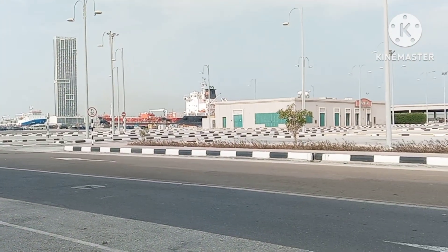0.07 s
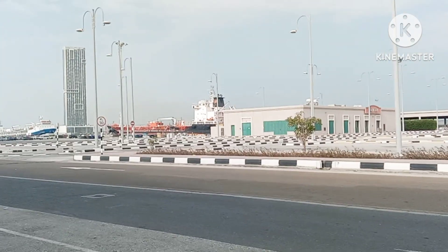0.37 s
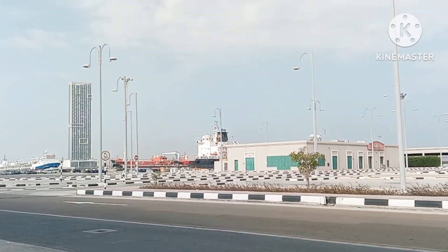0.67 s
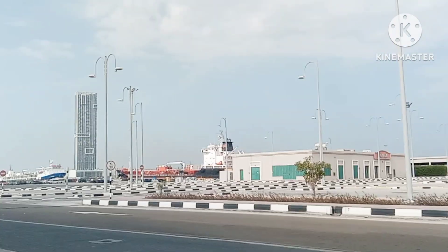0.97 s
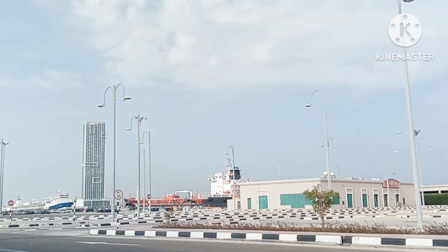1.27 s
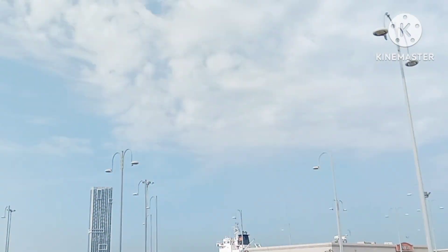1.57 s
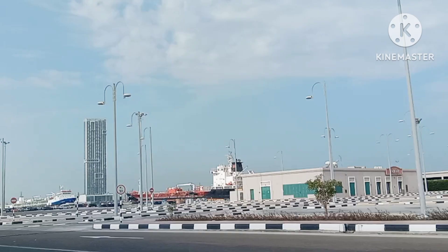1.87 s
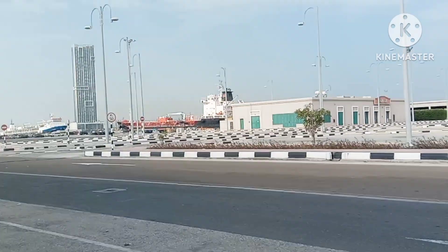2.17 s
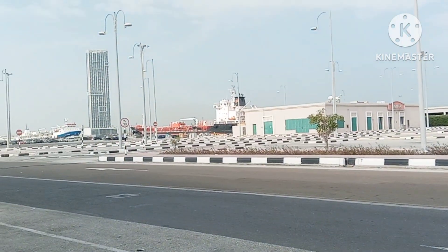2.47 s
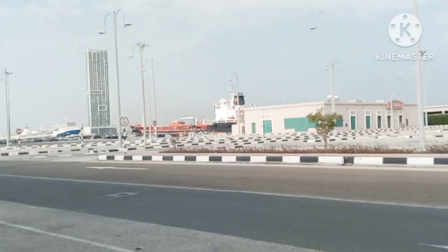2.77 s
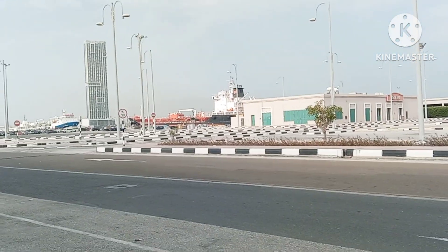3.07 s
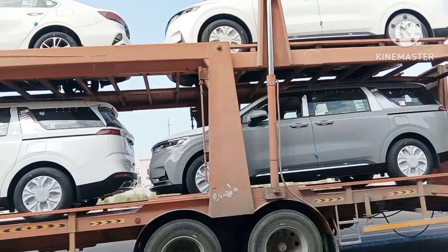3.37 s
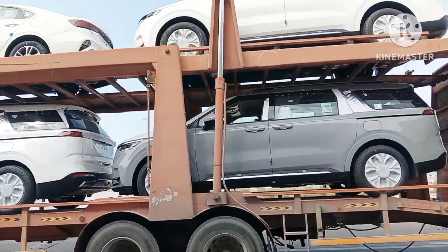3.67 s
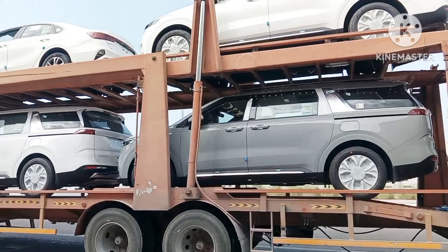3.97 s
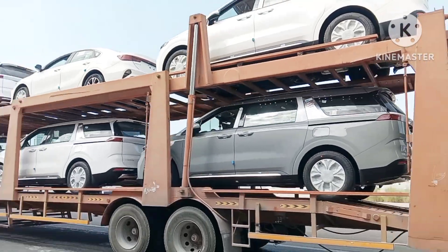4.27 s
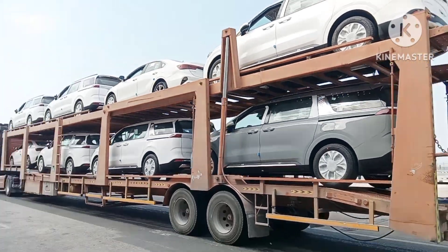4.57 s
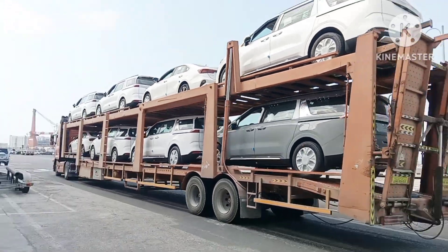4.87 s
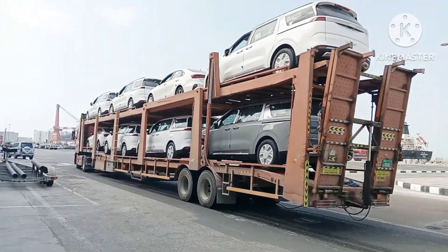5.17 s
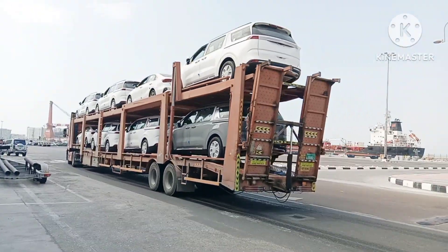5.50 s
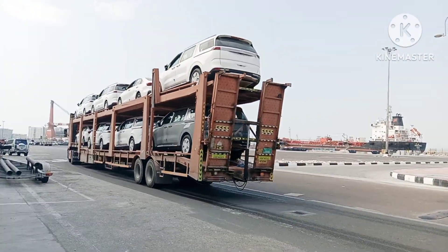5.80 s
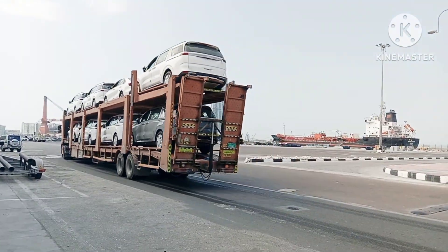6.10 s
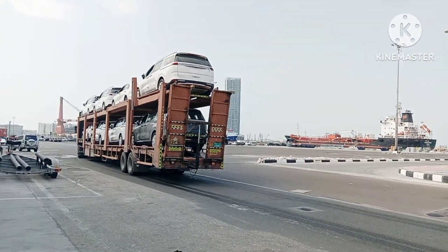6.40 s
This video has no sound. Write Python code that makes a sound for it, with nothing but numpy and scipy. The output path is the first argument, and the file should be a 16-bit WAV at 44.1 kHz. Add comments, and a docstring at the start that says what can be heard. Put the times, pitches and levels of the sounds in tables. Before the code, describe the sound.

On an open port road, faint bird chirps sit over the low throb of a far-off idling engine. A tiny silence breaks this, and a heavy truck swells in right beside the microphone with deep rumble, diesel drone and hissing tyres. A loud cluster of ringing steel clanks and short squeaks follows. The tyre noise eases as the truck moves off, still rumbling, with a few last rattles.

```python
"""A loaded car carrier truck rolls close by on a port road and draws away, still rattling.
Its tyres roar, its diesel drones, and its steel decks clank and squeak over a bump.
Before it comes, distant machinery hums and small birds chirp. That quiet opening stops after
about three seconds, and the truck fades in out of a brief silence."""
import sys
import numpy as np
from scipy import signal
from scipy.fft import rfft, irfft, next_fast_len
from scipy.io import wavfile
from scipy.ndimage import uniform_filter1d

SR = 44100
rng = np.random.default_rng(int(sys.argv[2]) if len(sys.argv) > 2 else 0)


def inscribe(sig):
    """Save sig as 16-bit PCM at rate SR to the path in sys.argv[1].

    A 1-D sig is mono; a 2-D sig holds one channel per row.
    Samples are clipped to [-1, 1] before scaling.
    """
    pcm = np.round(np.clip(np.atleast_2d(sig).T, -1, 1) * 32767)
    wavfile.write(sys.argv[1], SR, pcm.astype(np.int16))


N = 292824
TIME = np.arange(N) / SR
BINS = np.fft.rfftfreq(1024, 1 / SR)  # noise is shaped at these frequencies [Hz]
FRAMES = np.arange(N // 256 + 5) * 256 / SR  # and at these times [s]
TOP_HZ = 15600  # upper edge of the sound

# blows in the steel decks: (time [s], level [dB], brightness [dB per octave], ring against crash [dB])
DECK_BLOWS = [(4.954, -18.5, -1.5, -3), (5.03, -22, 3.5, -3), (5.082, -20.5, 2, 2), (5.291, -23, -3, -9),
              (5.34, -17, 1.5, -1), (5.393, -27, 2, 3), (6.4, -31.5, 2, 0), (6.532, -40.5, 0, 3.5),
              (6.585, -27, 0, 0), (6.632, -24.5, -1.5, 0)]
# how hiss fades: (level alongside [dB], axle loss [dB], tail loss [dB]), each loss per doubled distance
HISS_FADE = (-49.5, -0.32, 3.6)


def rolling():
    """Chassis rumble, tyre roar and tread hiss; rumble and roar change tone as the truck passes."""
    # each sound's spectrum, alongside or from behind: (frequency [Hz], level [dB])
    rumble_near = [(15, -58), (25, -15), (91, -12), (139, -7.5), (172, -4.5), (200, -1), (339, -2),
                   (425, -7.5), (500, -11), (650, -72), (1100, -120)]
    rumble_behind = [(15, -50), (25, -23), (59, -19), (78, -5), (114, -5.5), (188, -0.5), (233, -0.5),
                     (311, -9), (500, -28), (650, -56), (1100, -120)]
    roar_near = [(250, -11), (480, -3), (700, 1), (1000, -1.5), (1500, -2), (2200, -2), (2700, -18.5),
                 (3500, -27), (6000, -43)]
    roar_behind = [(250, -4), (480, -4.5), (750, 3.5), (1000, -4), (1250, 3), (1700, -2.5), (2100, -8.5),
                   (2700, -16), (3500, -28.5), (6000, -55)]
    tread = [(1800, 0.5), (3000, -3.5), (4100, -4), (4950, 0), (5700, -1), (6250, -3), (6700, 6),
             (7200, 4.5), (8000, -14), (9400, -1.5), (10700, -2), (12500, -18), (14000, -28), (15500, -15)]
    behind = along([(4.2, 0.15), (5.7, 1)], FRAMES)[:, None]
    rumble = noise((1 - behind) * across(rumble_near) + behind * across(rumble_behind), patchy_db=2.5)
    roar = noise((1 - behind) * across(roar_near) + behind * across(roar_behind), patchy_db=3)
    # the top of the hiss is beamed along the road
    sizzle_db = along([(3.6, 2.5), (4.1, -5.5), (4.75, 2.5), (5.8, -0.5), (6.4, 1.5)], FRAMES)[:, None]
    hiss = noise(across(tread) + sizzle_db * across([(7000, 0.095), (9500, 1)]), patchy_db=3.5)
    road = drift(32)  # uneven asphalt shakes all three together
    rumble *= amp(passing_db(-31, axle_loss_db=3.74, tail_loss_db=-0.37) + 0.77 * road)
    roar *= amp(passing_db(-31.5, axle_loss_db=1.03, tail_loss_db=4.5) + 1.14 * road)
    hiss *= amp(passing_db(*HISS_FADE) + 0.71 * road)
    return rumble + roar + hiss


def passing_db(db, axle_loss_db, tail_loss_db):
    """The level holds, then changes with each doubling of the distance to the axles and the tail."""
    speed_m_per_s, nearest_m = 7.8, 1.73
    axles_pass_s, tail_pass_s = 3.72, 5.32
    for pass_s, loss_db in (axles_pass_s, axle_loss_db), (tail_pass_s, tail_loss_db):
        travelled_m = speed_m_per_s * np.maximum(TIME - pass_s, 0)
        db = db - loss_db * np.log2(np.hypot(1, travelled_m / nearest_m))
    return db


def engine():
    """The diesel drones in wavering tones; most of the higher ones fade once the cab has gone by."""
    # engine tones: (pitch [Hz], level alongside [dB], level from behind [dB])
    tones = [(90.6, -45.5, -49.5), (120.1, -51, -46), (171.4, -34.5, -66), (238.3, -56, -48.5),
             (285, -45, -66), (347, -41, -60.5), (523, -42.5, -63.5)]
    behind = along([(3.95, 0.04), (4.9, 1)])
    speed = 1 + 0.00602 * drift(7)
    return sum(amp(near_db - 2.5 + behind * (far_db - near_db) + 3.86 * drift(15)) * sine(hz * speed)
               for hz, near_db, far_db in tones)


def deck_clanks():
    """Each blow makes a short crash and leaves the steel ringing, a little differently each time."""
    # the tones the steel rings with: (pitch [Hz], level [dB], time to fade by 60 dB [s])
    steel = [(1203, -7.5, 0.65), (1288.4, -11, 0.74), (1435, 5, 0.37), (1516, -3, 0.73), (1984.6, 7, 0.78),
             (2280, -7, .15), (2555, -10.5, .6), (2656, 7.5, 0.3), (2814, -3.5, 0.14), (3180, -6.5, 0.28),
             (3378, -7, 0.46), (3854, -11.5, 0.3), (3960, -18, 0.17), (4237, -16, 0.26), (4640, -7.5, 0.33),
             (5400, -2, 0.24), (5464, -1, 0.25), (6000, -8, 0.23), (6320, -22, 0.24), (6706, -3, 0.37),
             (7160, -10.5, 0.18), (7500, -21, 0.2), (8450, -22, .25), (8460, -32, 0.18), (9150, -16, 0.17),
             (9600, -24, 0.19), (10218, -24, 0.34), (10800, -28, 0.27), (11270, -23, 0.45),
             (11800, -23.5, 0.29)]
    # the noisy crash of a blow: (frequency [Hz], level [dB], time to fade by 60 dB [s])
    crash_bands = [(100, -18, .4), (480, -16, 0.3), (700, -5, 0.47), (1000, -6.5, 0.23), (1540, -2, 0.45),
                   (2030, -3.5, 0.66), (2820, -2.5, 0.27), (3730, -13.5, 0.53), (5260, -14, 0.47),
                   (7070, -5, 0.22), (8050, -24, 0.14), (11000, -19, 0.24), (13100, -36, 0.2),
                   (15500, -30, .2)]
    out, t = np.zeros(N), TIME[:SR]
    ring_hz, ring_levels, ring_fade_s = np.transpose(steel)[:, :, None]
    grid_hz = np.arange(0, SR // 2, 10)
    peaks_db = humps([(hz, 65, 11) for hz, _, _ in steel], grid_hz)  # the crash peaks at the same tones
    # the loose deck lands a second time, softer and with more ring
    rebounds = [(s + .014, db - 5.5, bright, ring_db + 1.5) for s, db, bright, ring_db in DECK_BLOWS]
    for s, db, bright, ring_db in DECK_BLOWS + rebounds:
        steel_noise = filtered(rng.standard_normal(SR), lambda f: np.interp(f, grid_hz, peaks_db))
        hz, age, spectrum = signal.stft(steel_noise, SR, nperseg=256)
        colour_db = across(crash_bands, hz) + bright * np.log2(np.clip(hz, 1000, 6000) / 2500)
        fade_s = across(crash_bands, hz, column=2)
        spectrum *= amp(colour_db[:, None] - 60 * age / fade_s[:, None])
        chatter = amp(2.4 * drift(300, SR))  # loose parts
        crash = signal.istft(spectrum, SR, nperseg=256)[1][:SR] * chatter
        crash /= crash[:SR // 50].std()
        gains = amp(ring_levels + bright * np.log2(ring_hz / 2500) + rng.standard_normal(ring_hz.shape))
        detuned_hz = ring_hz * (1 + 0.00069 * rng.standard_normal(ring_hz.shape))
        tones = np.sin(2 * np.pi * (detuned_hz * t + rng.random(ring_hz.shape)))
        ring = (gains * amp(-60 * t / ring_fade_s) * tones).sum(0) * np.sqrt(2) / np.linalg.norm(gains)
        attack = 1 - np.exp(-t / 0.0018)
        add(out, s, amp(db - 3.5) * (crash + amp(ring_db) * ring) * attack)
    return echoes(out, wet_db=-13.5, fade_s=0.52)


def squeaks():
    """Steel joints stick and slip as the trailer flexes: raspy tones swell, sag a little and die."""
    # slips: (loudest at [s], pitch [Hz], level [dB], rise [s], fall [s])
    slips = [(4.872, 7455, -19.5, .007, 0.011), (4.908, 7440, -38, .012, 0.031),
             (5.168, 2408, -25, .035, .08), (5.207, 2369, -14.5, .018, 0.024)]
    sag_octaves_per_s, overtones_db = .08, {2: -30, 3: -26.5}
    out = np.zeros(N)
    for s, hz, db, rise, fall in slips:
        t = np.arange(-3 * rise, 6 * fall, 1 / SR)
        pitch = hz * 2 ** (-sag_octaves_per_s * t) * (1 + 0.0065 * drift(207, len(t)))
        tone = sine(pitch)
        tone += sum(amp(level) * sine(k * pitch) for k, level in overtones_db.items() if k * hz < TOP_HZ)
        swell = np.exp(np.where(t < 0, -(t / rise) ** 2, -t / fall))
        flutter = amp(db + 1.8 * drift(120, len(t)))
        rasp = 1 + 0.15 * drift(460, len(t))
        add(out, s + t[0], tone * swell * flutter * rasp)
    return echoes(out, wet_db=-7.5, fade_s=0.34)


def chassis_thumps():
    """The truck's frame thumps over seams in the road and thuds under every blow of the decks."""
    # thumps at the seams: (time [s], length [s], frequency [Hz], level [dB])
    seams = [(3.501, 0.19, 222, -33), (3.748, .17, 268, -32.5), (3.955, 0.1, 233, -27.5),
             (4.25, 0.14, 178, -33.5), (4.53, 0.12, 265, -32)]
    out = np.zeros(N)
    for s, length, hz, db in seams:
        add(out, s, burst(length, hz, width_hz=120, db=db, fall_db=5, softness=0.4))
    for s, db, bright, _ in DECK_BLOWS:
        thud_db = db - 14 - 0.8 * bright  # dull blows are the heavy ones
        add(out, s, burst(length=0.103, hz=175, width_hz=137, db=thud_db, fall_db=3.5, softness=0.32))
    return out


def chafing():
    """The load's straps rub in fits as the truck passes; a few deck joints scrape louder."""
    # rubbing straps: (frequency [Hz], width [Hz], level against the tread hiss [dB])
    straps = [(5010, 230, -15), (5630, 1400, -11.5)]
    # scraping joints: (time [s], length [s], frequency [Hz], width [Hz], level [dB])
    scrapes = [(3.56, .086, 4920, 150, -50.5), (3.55, 0.13, 3300, 730, -50.5), (5.56, 0.11, 1930, 380, -40),
               (5.84, 0.34, 2100, 190, -51)]
    out = np.zeros(N)
    for hz, width, db in straps:
        rub = noise(humps([(hz, width, 50)], BINS), patchy_db=3)
        out += rub * amp(passing_db(*HISS_FADE) + db + 4.5 * drift(14))
    for s, length, hz, width, db in scrapes:
        add(out, s, burst(length, hz, width, db, fall_db=-1, softness=0.78))
    return out


def birds():
    """Small birds repeat a quick phrase, chirp, whistle and peep; a harsh hiss shares their echoes."""
    # each time the phrase is sung: (time [s], pitch [Hz], level [dB])
    songs = [(.157, 4970, -55.5), (.988, 4830, -55), (2.102, 4670, -53.5)]
    # its notes: (delay [s], length [s], pitch [ratio], slide [octaves], level [dB], rasp [0-1])
    phrase = [(-.03, .04, 1.15, -0.036, -7.5, .9), (0, .05, 0.97, -.12, -0.5, 0.2),
              (.05, 0.022, 1.14, -.15, -1, .1), (.064, 0.034, 0.91, 0.083, -1, .25),
              (.095, 0.02, .84, -.4, -5, .15)]
    # single chirps: (time [s], length [s], pitch [Hz], slide [octaves], level [dB], upper voice [dB])
    chirps = [(0, 0.015, 3900, 0.087, -55, -8), (0.605, 0.039, 3904, 0.073, -56, -5),
              (.836, 0.053, 4870, -0.0072, -57.5, -27), (0.939, 0.031, 4370, -0.41, -58, -18),
              (2.223, 0.029, 4040, 0.18, -55, -5), (2.524, 0.035, 3860, .15, -66.5, -9),
              (2.919, .032, 4760, -.15, -58.5, -20), (2.947, .028, 4050, 0.14, -63, -3),
              (2.992, 0.026, 3920, 0.16, -55.5, -9)]
    # the whistling bird's peep: (time [s], length [s], pitch [Hz], level [dB])
    peeps = [(2.694, 0.08, 3196, -63)]
    out = bird_whistle() + harsh_hiss()
    for s, hz, db in songs:
        for delay, length, ratio, slide, note_db, rasp in phrase:
            add(out, s + delay, bird_note(length, hz * ratio, slide, db + note_db, rasp, arch=0.204))
    for s, length, hz, slide, db, upper_db in chirps:
        for voice_hz, voice_db in (hz, db), (hz * 1.19, db + upper_db):  # the two sides of the throat
            add(out, s, bird_note(length, voice_hz, slide, voice_db, rasp=0.21, arch=0.097))
    for s, length, hz, db in peeps:
        add(out, s, bird_note(length, hz, slide=0, db=db, rasp=.04, arch=0.028))
    out = echoes(out, wet_db=-8.5, fade_s=0.069)  # nearby ground and walls
    return echoes(out, wet_db=-11, fade_s=0.5)  # the open yard


def bird_note(length, hz, slide, db, rasp, arch):
    """One note: its pitch arches and slides (both in octaves), and rasp shakes it."""
    position = np.linspace(-1, 1, int(length * SR))
    size = len(position)
    pitch = hz * 2 ** (slide * position / 2 - arch * position ** 2) * (1 + 0.1 * rasp * drift(1200, size))
    flutter = amp(db - 2.5 + 3.5 * drift(160, size))
    return flutter * (sine(pitch) + amp(-40) * sine(2 * pitch)) * signal.windows.tukey(size, .35)


def bird_whistle():
    """A nearer bird whistles an unsteady tone that lifts a little, then falls."""
    # the whistle's path: (time [s], pitch [Hz], level [dB])
    path = [(1.92, 2820, -66), (1.938, 3040, -48), (1.97, 3207, -54.5), (2.0, 3180, -53),
            (2.022, 2790, -39), (2.05, 2063, -37.5), (2.074, 1589, -47.5), (2.088, 1470, -62)]
    s, hz, db = np.transpose(path)
    pitch = np.interp(TIME, s, hz) * (1 + 0.0057 * drift(207))
    tone = sine(pitch) + amp(-42) * sine(2 * pitch) + amp(-45) * sine(3 * pitch)
    return tone * amp(np.interp(TIME, s, db) + 3.5 * drift(120)) * (TIME > s[0]) * (TIME < s[-1])


def harsh_hiss():
    """A brief harsh hiss, gathered in a few bands."""
    # the bands of the hiss: (frequency [Hz], width [Hz], boost [dB])
    bands = [(1530, 370, 26), (2910, 870, 25), (4700, 870, 27), (5900, 400, 17), (7200, 910, 21),
             (8550, 600, 16)]
    # its loudness: (time [s], level [dB])
    loudness = [(.86, -80), (.872, -61), (.92, -61), (.96, -64), (1.01, -73)]
    harsh = noise(humps(bands, BINS) - BINS / 1500, patchy_db=2)
    return harsh * amp(along(loudness)) * (TIME > loudness[0][0]) * (TIME < loudness[-1][0])


def scuffs():
    """Faint scuffs and a short hiss sound nearby."""
    # scuffs: (time [s], length [s], level [dB])
    rubs = [(0.735, .03, -52), (0.754, 0.051, -55), (1.279, 0.067, -50)]
    # parts of the hiss: (time [s], length [s], frequency [Hz], width [Hz], level [dB])
    hisses = [(3.079, .06, 10500, 6000, -71), (3.09, 0.057, 6560, 2020, -59),
              (3.139, 0.089, 6000, 3280, -65)]
    out = np.zeros(N)
    for s, length, db in rubs:
        add(out, s, burst(length, hz=2280, width_hz=1840, db=db, fall_db=21, softness=.17))
    for s, length, hz, width, db in hisses:
        add(out, s, burst(length, hz, width, db, fall_db=-0.5, softness=.2))
    return out


def port():
    """A distant idling diesel and traffic make a throbbing wash of noise with wavering hums."""
    # spectra of the wash and of the faint high air over it: (frequency [Hz], level [dB])
    wash_colour = [(15, -68), (25, -40), (82, 1), (189, -8), (218, -3.5), (245, 0), (312, -6), (681, -18),
                   (884, -14), (1040, -25), (1240, -13.5), (1370, -14.5), (3000, -37), (3900, -74),
                   (6600, -120)]
    air_colour = [(1500, -5.5), (2700, 4.5), (4000, -1), (7000, -8), (8000, -22), (15000, -16)]
    # peaks and dips in the wash: (frequency [Hz], width [Hz], boost [dB])
    bands = [(356, 84, 2), (601, 163, 6.5), (806, 67, -9.5), (910, 92, 7), (1096, 63, 6), (1374, 135, -11)]
    # the breeze carries the wash nearer and further: (time [s], level [dB])
    breeze = [(0, -0.5), (.45, -1.5), (.77, 1.5), (1.05, -2.5), (1.65, -0.5), (2.1, 3), (2.5, 0.5),
              (3.2, 0)]
    # machinery tones: (pitch [Hz], level [dB])
    tones = [(91.5, -55), (118.4, -56.5), (166.9, -56), (215.3, -50.5), (436.0, -69), (592.2, -64.5),
             (882.9, -76)]
    # the diesel throbs once a working cycle: (multiple of the cycle rate [ratio], depth [dB])
    throb = [(1, 0.49), (3, 0.87), (4, 0.84)]
    cycle_hz, peak_s = 7.5, .095
    throb_db = sum(depth * np.cos(2 * np.pi * k * cycle_hz * (TIME - peak_s)) for k, depth in throb)
    wash = noise(across(wash_colour) + humps(bands, BINS), patchy_db=3)
    wash *= amp(-48 + along(breeze) + throb_db)
    hum = sum(amp(db - 1.5 + 1.9 * drift(9.5) + throb_db) * sine(hz + 3 * drift(10.6)) for hz, db in tones)
    air = noise(across(air_colour), patchy_db=1) * amp(-75.5)
    return wash + hum + air


def amp(db):
    """Turns decibels into a gain."""
    return 10 ** (np.asarray(db) / 20)


def unit(x):
    """Scales a signal to an average strength (rms) of one."""
    return x / np.sqrt(np.mean(x ** 2) + 1e-20)


def along(rows, t=TIME):
    """Reads a curve over time."""
    return np.interp(t, *np.transpose(rows))


def across(rows, hz=BINS, column=1):
    """Reads a curve over frequency, with octaves evenly spaced."""
    rows = np.array(rows)
    return np.interp(np.log(hz + 1), np.log(rows[:, 0]), rows[:, column])


def humps(rows, hz):
    """Bell-shaped peaks or dips in a spectrum, in dB."""
    return sum(db * np.exp(-2 * ((hz - centre) / width) ** 2) for centre, width, db in rows)


def drift(rate_hz, size=N):
    """A smooth random wobble of strength one, up to about rate_hz fast."""
    count = next_fast_len(max(size, SR // 2))
    hz = np.fft.rfftfreq(count, 1 / SR)
    return unit(irfft(rfft(rng.standard_normal(count)) * np.exp(-(hz / rate_hz) ** 2), count))[:size]


def add(mix, s, sound):
    """Mixes a sound in at s seconds."""
    part = mix[max(round(s * SR), 0):][:len(sound)]
    part += sound[:len(part)]


def sine(hz):
    """A tone of strength one that follows a pitch curve."""
    return np.sqrt(2) * np.sin(2 * np.pi * (np.cumsum(hz) / SR + rng.random()))


def noise(colour_db, patchy_db):
    """Noise of strength one with a given spectrum and brief louder and softer patches."""
    real, imag, patches = rng.standard_normal((3, len(FRAMES), len(BINS)))
    patches = unit(uniform_filter1d(uniform_filter1d(patches, size=14, axis=0), size=7, axis=1))
    spectrum = (real + 1j * imag) * amp(colour_db + patchy_db * patches)
    return unit(signal.istft(spectrum.T, nperseg=1024, noverlap=768)[1][:N])


def burst(length, hz, width_hz, db, fall_db, softness):
    """A short grainy rub or jolt in one band; softness rounds off its ends."""
    size = int(length * SR)
    band = np.exp(-2 * ((np.fft.rfftfreq(size, 1 / SR) - hz) / width_hz) ** 2)
    puff = unit(irfft(rfft(rng.standard_normal(size)) * band, size))
    level_db = db - fall_db * np.linspace(0, 1, size) + 2 * drift(110, size)
    return puff * amp(level_db) * signal.windows.tukey(size, softness)


def filtered(x, gain_db):
    """Colours a sound by a function from Hz to dB."""
    size = next_fast_len(len(x) + SR // 10)
    return irfft(rfft(x, size) * amp(gain_db(np.fft.rfftfreq(size, 1 / SR))), size)[:len(x)]


def echoes(x, wet_db, fade_s):
    """Adds scattered echoes from road, walls and vehicles, which fall by 60 dB in fade_s."""
    t, echoes_per_s = TIME[:SR // 2], 2000
    taps = rng.standard_normal(len(t)) * (rng.random(len(t)) < echoes_per_s / SR)
    taps *= (t > .004) * amp(-60 * t / fade_s)
    return x + amp(wet_db) * signal.fftconvolve(x, taps / np.linalg.norm(taps))[:N]


def scene():
    """The quiet port, a short silence, then the truck fades in."""
    silence_from_s, silence_to_s = 3.222, 3.266
    fade_start_s, fade_length_s = 3.255, 0.29
    quiet = port() + birds() + scuffs()
    truck = rolling() + engine() + deck_clanks() + squeaks() + chafing() + chassis_thumps()
    fade_in = np.clip((TIME - fade_start_s) / fade_length_s, 0, 1)
    return (quiet * (TIME < silence_from_s) + truck * fade_in * (TIME > silence_to_s))[None]


def record(dry):
    """The microphone adds a nasal tone and thins the bass; the highest treble is cut off."""
    # microphone resonances: (frequency [Hz], width [Hz], boost [dB])
    peaks = [(1254, 106, 10.5), (8300, 560, 1)]
    low_cut_hz = 50
    coloured = filtered(dry[0], lambda hz: humps(peaks, hz) - 10 * np.log10(1 + (low_cut_hz / (hz + 1)) ** 6))
    treble_cut = signal.firwin(511, TOP_HZ, window=("kaiser", 9), fs=SR)
    return signal.oaconvolve(coloured, treble_cut, "same")[None]


dry = scene()
out = record(dry)
inscribe(out)
```